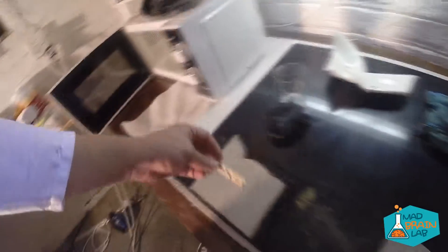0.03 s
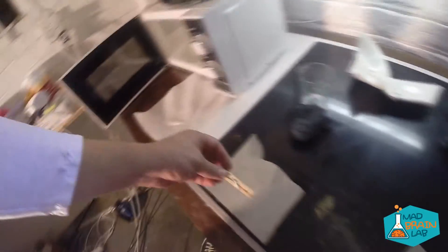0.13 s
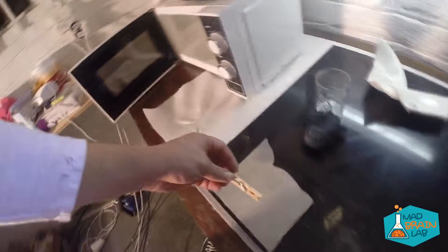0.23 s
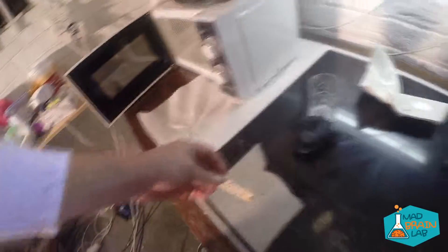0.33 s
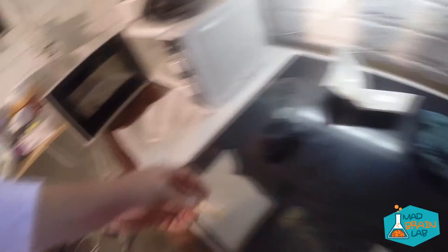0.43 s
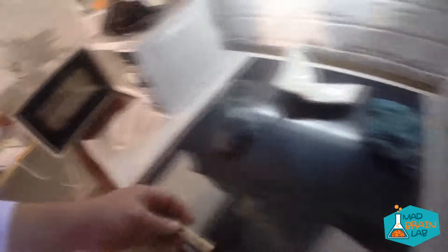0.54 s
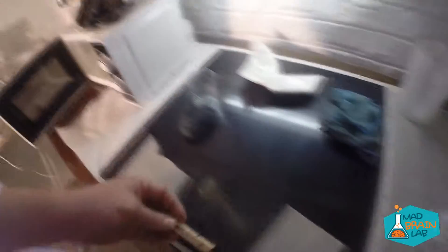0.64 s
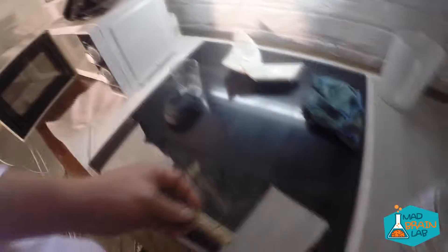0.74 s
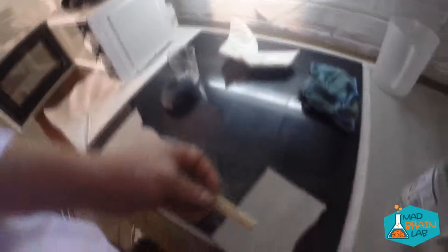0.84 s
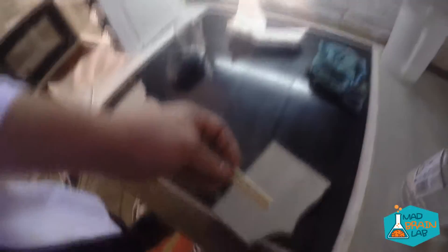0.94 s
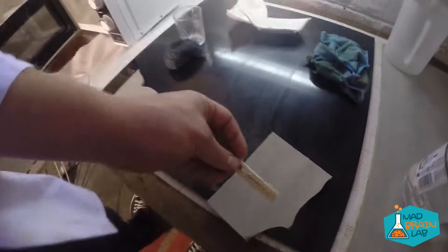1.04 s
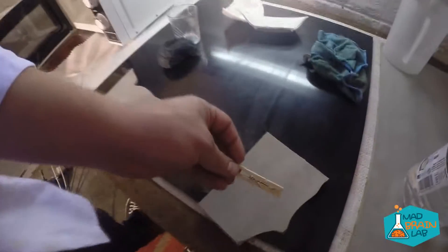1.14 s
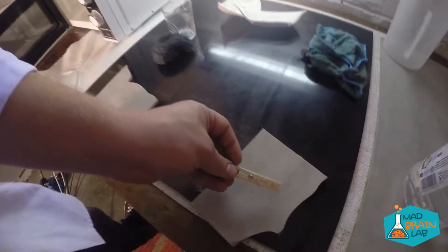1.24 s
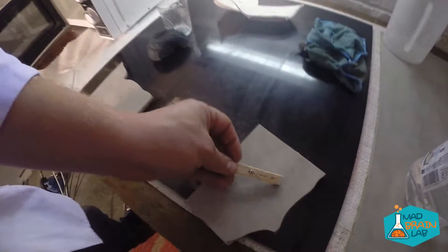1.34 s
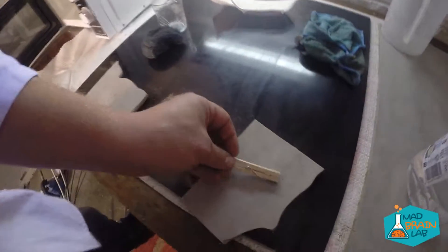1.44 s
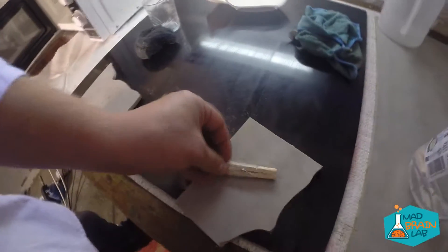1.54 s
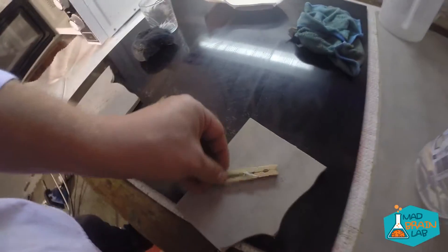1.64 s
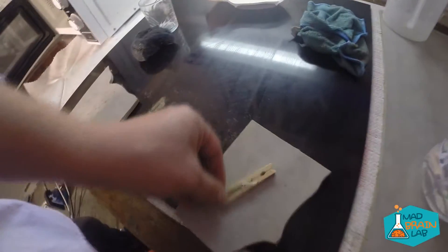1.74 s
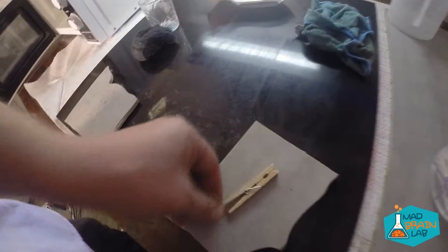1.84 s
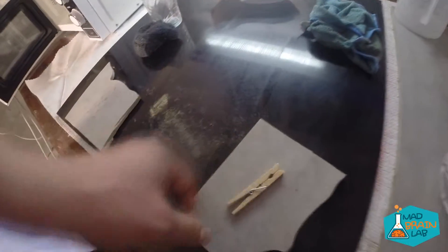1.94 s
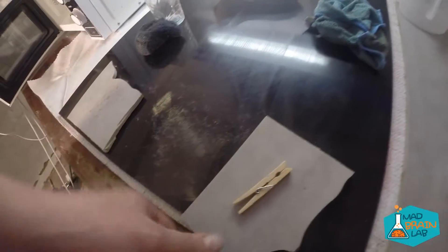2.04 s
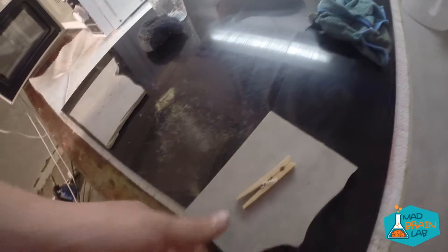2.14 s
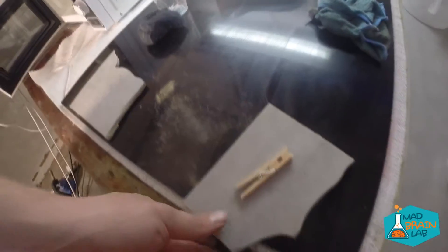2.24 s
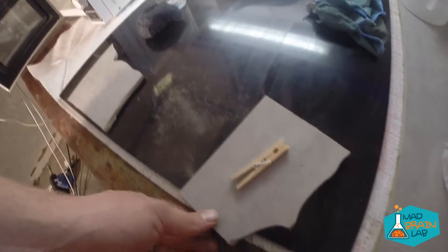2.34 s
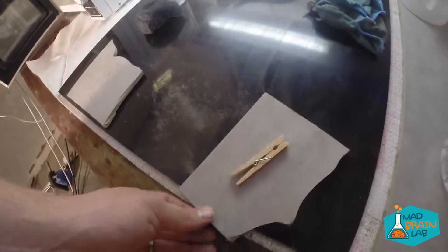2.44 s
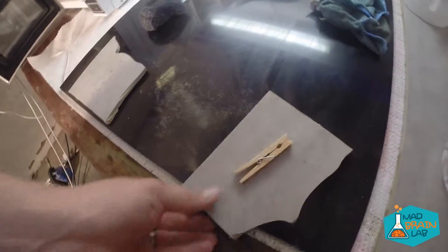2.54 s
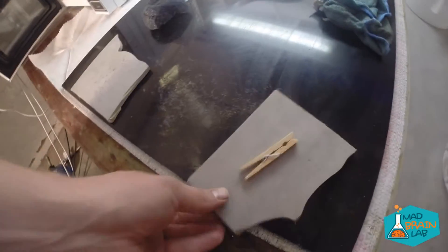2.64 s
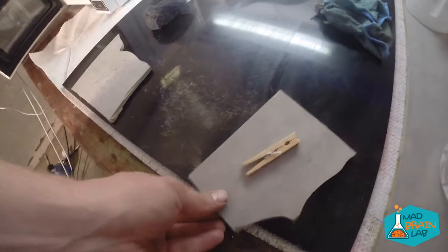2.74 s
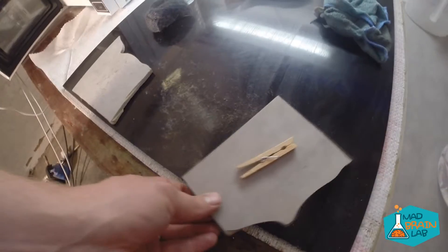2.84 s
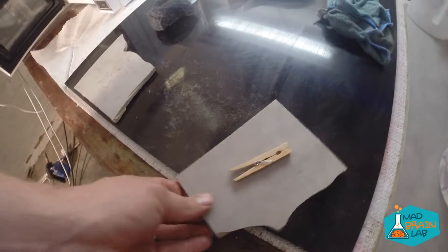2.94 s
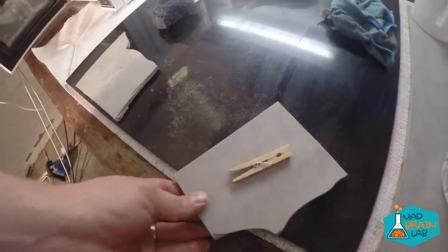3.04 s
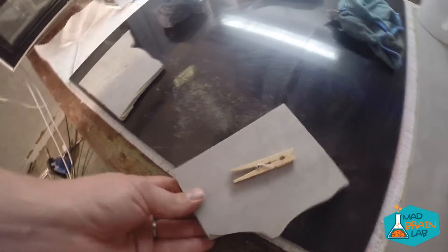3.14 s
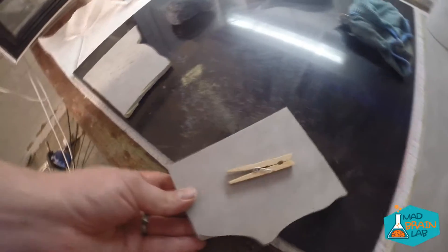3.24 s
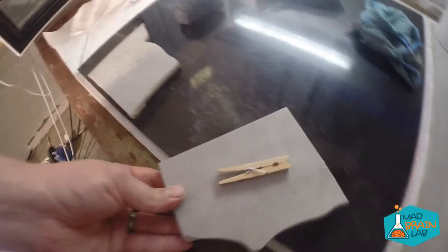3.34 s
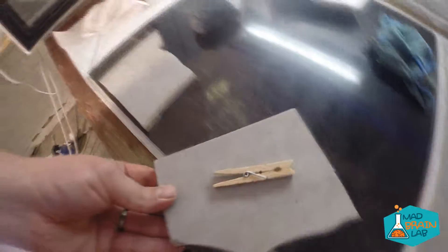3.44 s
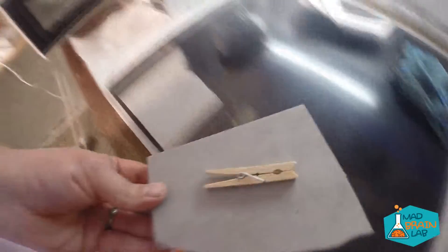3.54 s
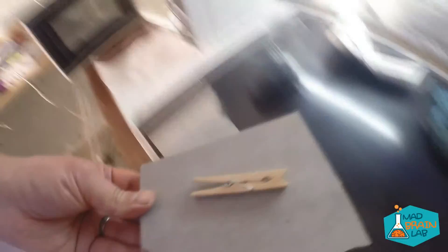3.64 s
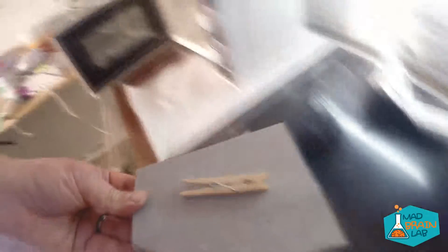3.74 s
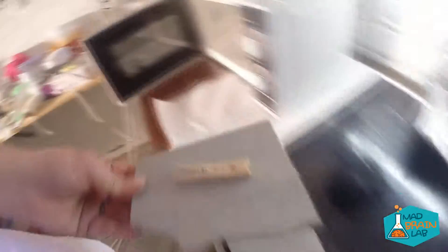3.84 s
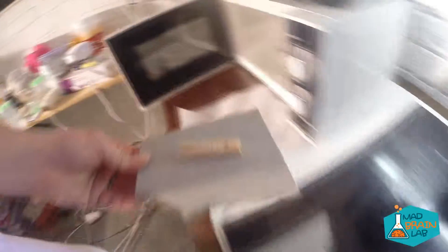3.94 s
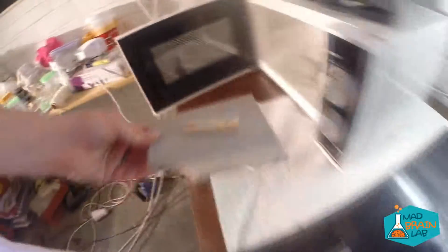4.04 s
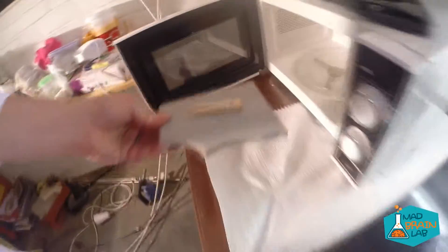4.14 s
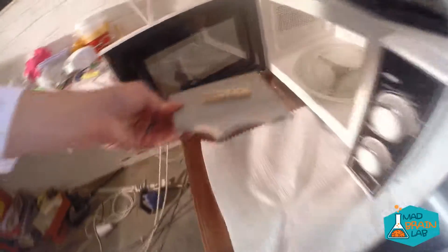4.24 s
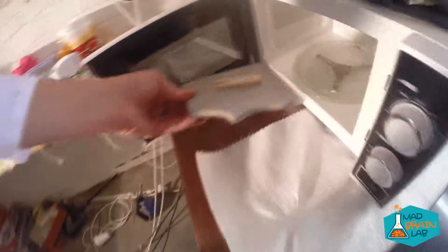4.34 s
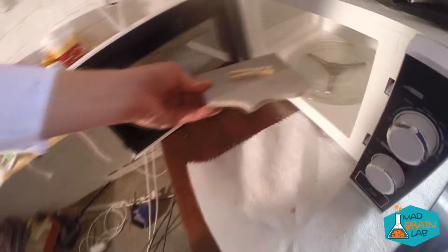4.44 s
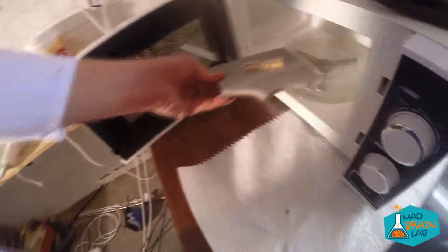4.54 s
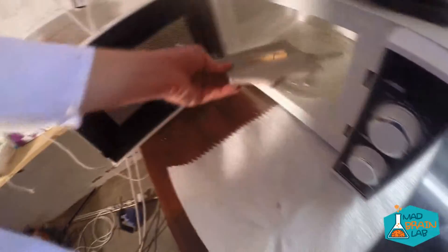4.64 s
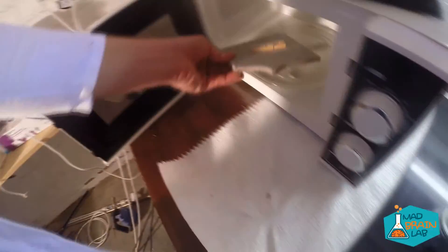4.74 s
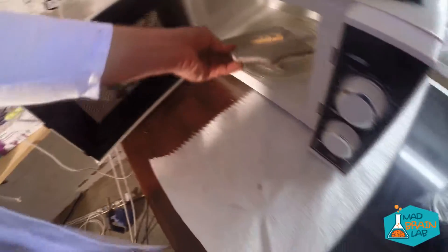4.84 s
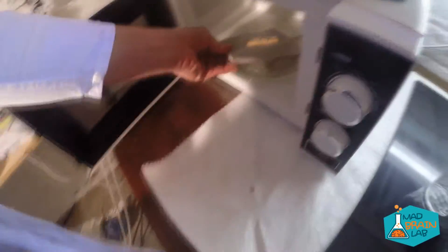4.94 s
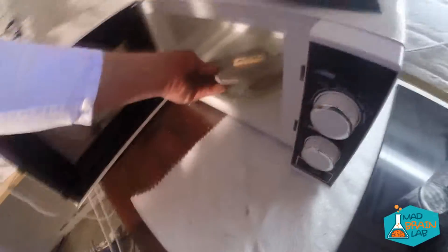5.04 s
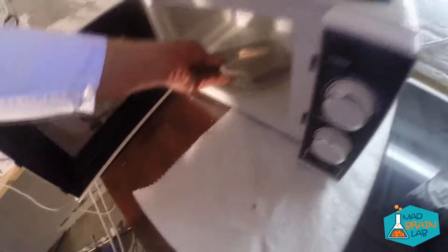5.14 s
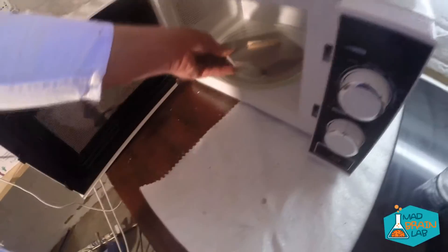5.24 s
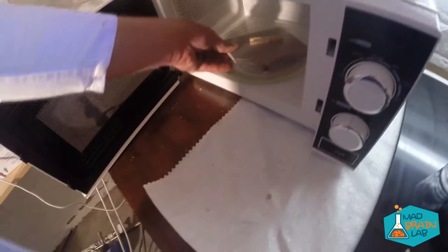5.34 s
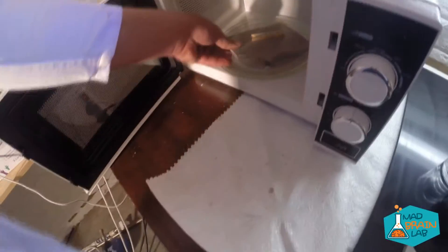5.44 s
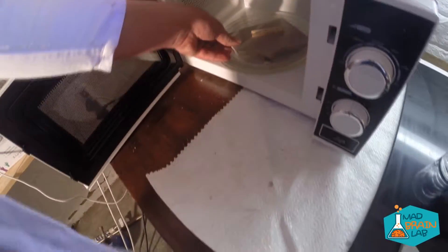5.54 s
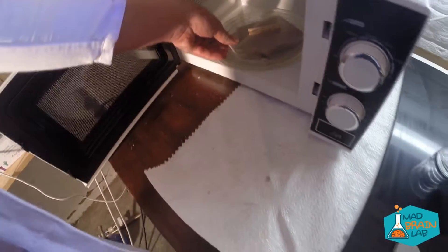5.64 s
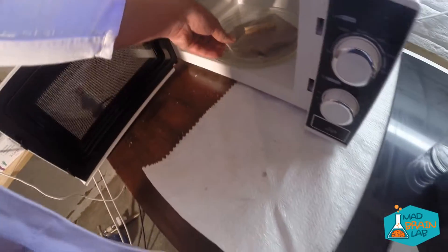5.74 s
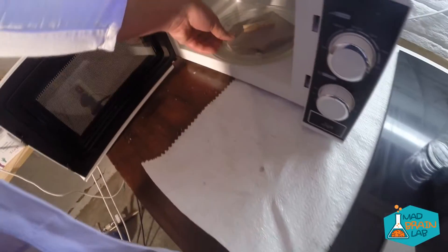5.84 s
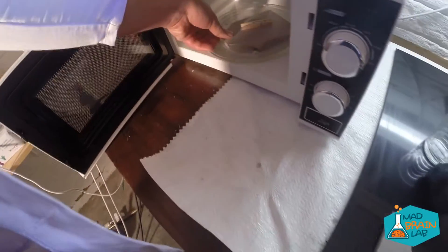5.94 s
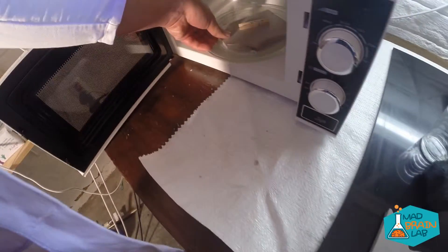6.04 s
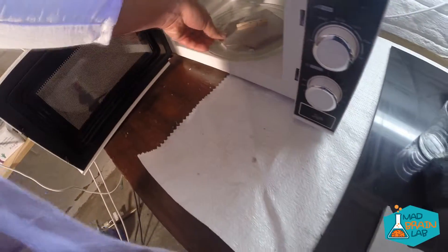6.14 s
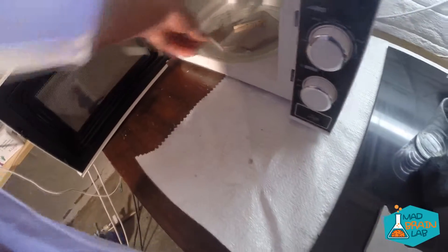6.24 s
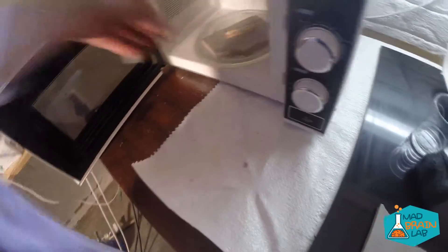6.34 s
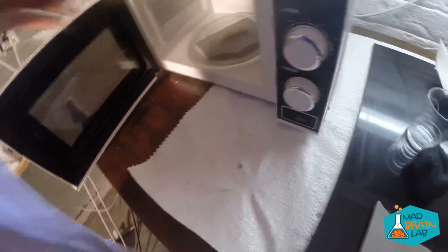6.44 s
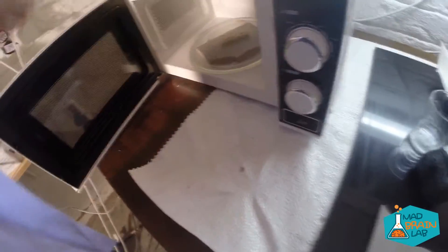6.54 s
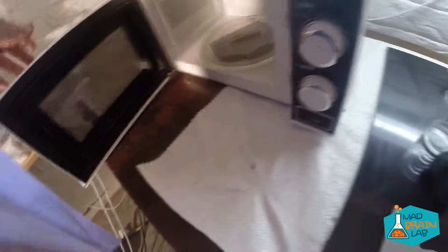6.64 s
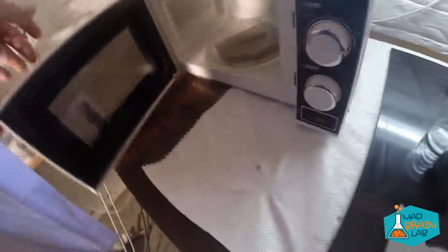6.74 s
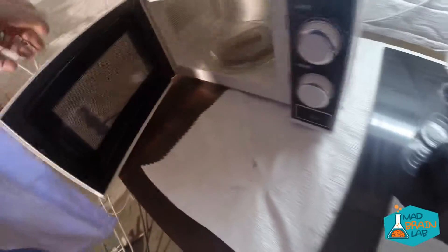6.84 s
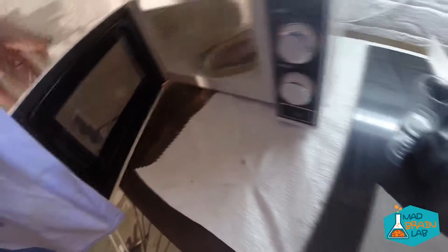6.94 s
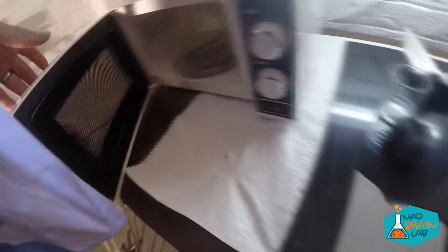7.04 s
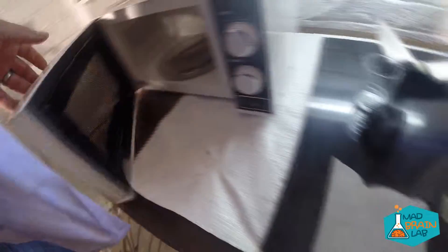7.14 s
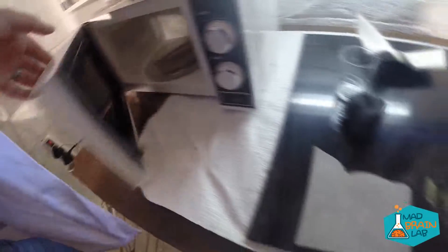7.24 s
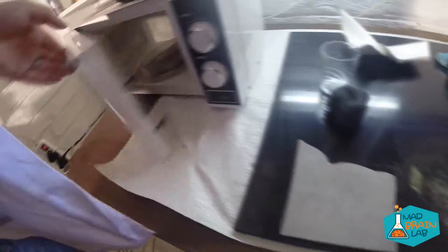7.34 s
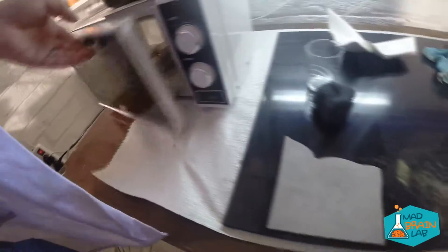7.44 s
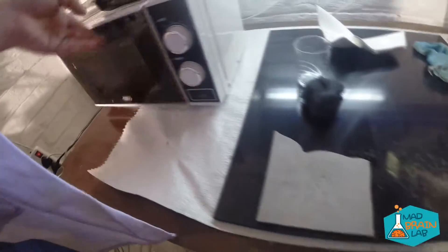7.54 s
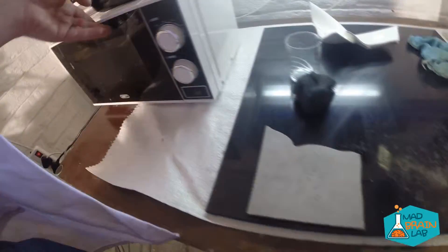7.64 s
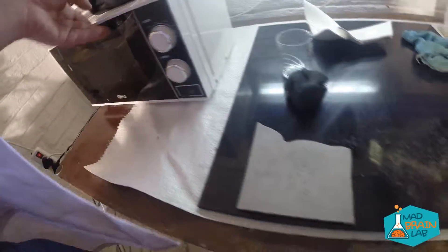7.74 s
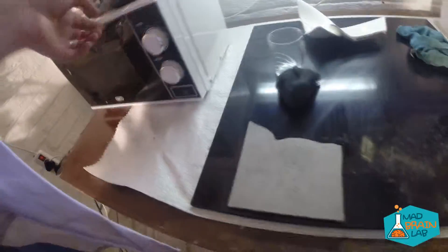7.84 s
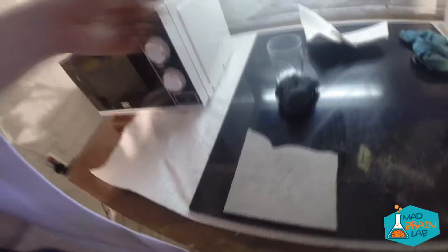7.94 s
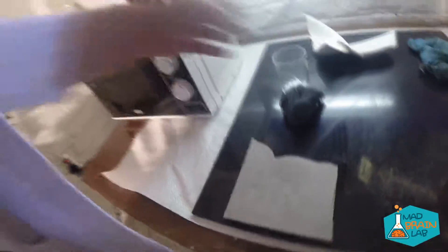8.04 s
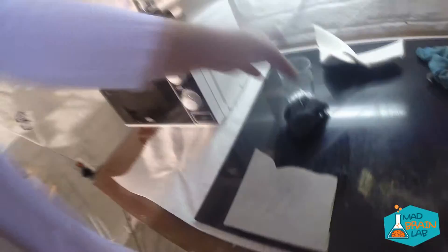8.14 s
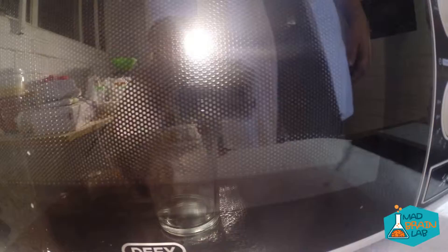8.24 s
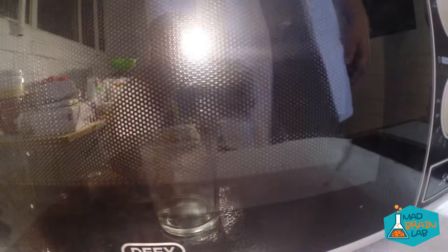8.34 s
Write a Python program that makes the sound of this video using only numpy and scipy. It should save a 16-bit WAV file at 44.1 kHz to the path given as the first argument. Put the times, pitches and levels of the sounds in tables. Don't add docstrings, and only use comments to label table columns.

```python
import sys
import numpy as np
from scipy import signal
from scipy.fft import rfft, irfft, next_fast_len
from scipy.io import wavfile
from scipy.ndimage import map_coordinates

SR = 44100
rng = np.random.default_rng(int(sys.argv[2]) if len(sys.argv) > 2 else 0)


def unload_audio(sound):
    columns = np.transpose(np.atleast_2d(sound))
    steps = np.round(np.clip(columns, -1, 1) * 32767)
    wavfile.write(sys.argv[1], SR, steps.astype(np.int16))


def volts_from_decibels(level):
    exponent = np.asarray(level, float) / 20
    return 10 ** exponent


N = 369558
T = np.arange(N) / SR

# (frequency [Hz], level [dB per Hz])
HISS = [(20, -12), (44, -7), (241, -3), (380, -0.5), (873, 0), (1440, -4), (2100, -6), (3200, -13),
        (5000, -17.5), (6500, -23), (8500, -28), (12500, -30.5), (15000, -41.5), (16000, -57)]
# (time [s], level [dB], rise [s], fall [s])
STIR = (8.5, -46, 2, 0.4)
# (frequency [Hz], level [dB])
WHISTLE = (11000, -64.5)
# (frequency [Hz], level [dB], length [s])
BLIP = (11267, -60.5, .024)
BLIP_TIMES = [1.992, 2.06, 2.207, 2.306, 2.482, 2.62, 2.744, 2.894, 3.041, 3.943, 4.063, 4.174, 4.278,
              4.397, 4.523, 4.704, 4.827, 4.996, 5.151, 6.025, 6.16, 6.21, 6.366, 6.504, 6.622, 6.781,
              6.904, 7.228, 7.38, 7.49]
# (frequency [Hz], time to fall 60 dB [s])
ROOM = [(150, 0.31), (1000, 0.44), (3000, 0.28), (8000, 0.057), (15000, 0.18)]
# (time [s], level [dB])
THUDS = [(0.931, -33), (1.0, -42), (5.087, -37), (6.179, -42), (6.223, -40), (6.385, -33), (7.918, -31),
         (7.969, -28), (8.06, -28), (8.186, -31), (8.34, -22)]
# (time [s], level [dB])
BRIEF_DIP = [
    (8.326, 0),
    (8.333, -16),
    (8.336, 0),
]

# (time [s], level [dB], held [s], swell [dB])
DRAG = [
    (8.06, -29.5, 0.19, 4.5),
    (8.29, -39, 0.041, 4),
]
# (frequency [Hz], width [Hz], level [dB])
DRAG_BODY = [(760, 360, -14.5), (1686, 220, 4), (2390, 334, 0.5), (3940, 150, -4), (5000, 740, -18),
             (6060, 500, -19), (8000, 1200, -31), (9500, 900, -33)]
# (time [s], level [dB], held [s], swell [dB])
HINGE = [
    (7.262, -48, 0.099, 6.5),
    (7.39, -50.5, .19, -0.5),
]
# (time [s], level [dB], centre [Hz])
CREAKS = [(7.224, -29.5, 5000), (7.229, -27, 1600), (7.2435, -28, 3300), (7.262, -36, 6200),
          (7.2745, -39, 8000), (7.286, -34, 6000), (7.304, -33, 6300), (7.317, -34, 3300),
          (7.337, -31, 5500), (7.344, -31, 5600), (7.3717, -27.5, 2500), (7.372, -37, 5000),
          (7.43, -36, 4500), (7.442, -32, 3300), (7.5085, -36, 6050)]
# (frequency [Hz], level [dB per Hz])
HINGE_AIR = [(300, -17), (1500, 5.5), (3300, -1), (6000, -7.5), (9500, -16), (13000, -39)]

# (time [s], ring [dB], clatter [dB], clatter held [s], clatter time to fall 60 dB [s])
CATCH_HITS = [
    (8.058, -18.5, -26.5, 0.0037, .02),
]
DISH_HITS = [
    (8.336, -17, -14.5, 0.0064, 0.031),
    (8.342, -10, -14.5, 0.0068, 0.023),
    (8.357, -22, -15, 0.0039, 0.017),
    (8.366, -31, -29, 0.01, .05),
    (8.376, -24, -30, .003, .05),
]
DOOR_HITS = [
    (7.654, -28, -24.5, .005, 0.062),
    (7.675, -39, -26, 0.0084, 0.068),
    (7.6945, -21, -15, 0.0033, .02),
    (7.698, -12.5, -9, 0.0063, 0.027),
    (7.7065, -17.5, -13.5, .005, 0.025),
]
RATTLE_HITS = [
    (7.710, -16, -14.5, 0.0054, 0.056),
    (7.727, -22, -16.5, .006, 0.055),
    (7.742, -33, -21.5, .006, 0.073),
    (7.762, -33, -26.5, 0.0093, 0.067),
    (7.792, -31, -35, 0.0084, .15),
    (7.82, -37, -37, 0.0084, 0.13),
]
PEG_HITS = [
    (0.968, -33, -37, 0.004, .012),
    (0.999, 1, -17.5, 0.0016, 0.018),
    (1.003, -37, -21.5, 0.028, 0.0087),
    (1.024, -27, -22.5, 0.0019, .008),
    (1.032, -40, -28, 0.013, .05),
    (1.05, -40, -29.5, 0.015, .05),
    (1.088, -30, -40.5, .025, .05),
]
SET_HITS = [
    (5.058, -2.5, -15.5, 0.0076, 0.17),
    (5.096, -31, -23, 0.0091, 0.22),
    (5.125, -45, -33, 0.056, .03),
]
DROP_HITS = [
    (6.2165, -16.5, -17, 0.0055, 0.028),
    (6.222, -3, -16, 0.03, .03),
]
ROCK_HITS = [
    (6.236, -8, -30, .003, .02),
    (6.2715, -13.5, -30, .003, 0.027),
]
SETTLE_HITS = [
    (6.258, -15, -19.5, 0.0061, 0.11),
    (6.272, -20, -21, .004, 0.044),
    (6.287, -18, -23, 0.0056, 0.078),
]

# (frequency [Hz], level [dB], time to fall
# 60 dB [s])
CATCH = [(120, -7, 0.046), (348, -21, .04), (692, 9, 0.029), (7800, -16, 0.033)]
DISH = [(98, -30, 0.053), (785, -29, 0.083), (1460, 2.5, 0.072), (1940, 6, 0.06), (2250, -3, 0.081),
        (2455, -0.5, 0.45), (2570, -18, .1), (5510, -7, 0.057), (5860, -16, .05), (9570, -29, 0.33)]
DOOR = [(179, -6, 0.21), (243.4, -17, 0.71), (370.3, -4.5, 0.2), (423, -4.5, 0.22), (646, -8.5, 0.39),
        (844, -0.5, 0.13), (1220, -2, 0.08), (1446, 4, 0.13), (1887, 3.5, 0.1), (2260, -5, .08),
        (2564, 5, 0.1), (3310, 2, 0.12), (3880, -7, 0.1), (4830, -10, .08), (5750, -15, 0.08)]
PEG = [(197, -29, 0.0225), (680, 6.5, 0.017), (1400, 8, 0.0095), (1836, 8, 0.02), (2090, 10.5, 0.014),
       (2860, -10, .012)]
PLATE = [(276, -27.5, 0.27), (700, -25, 0.49), (1066, 0.5, 0.49), (1000, -20, .2), (1112, -12, 0.26),
         (1150, -21, .2), (1227, -12, 0.2), (1231, -10.5, 0.46), (1563, -7.5, 0.068), (2404, -19.5, 1),
         (2517, -21, .25), (3050, -14, 0.084), (3310, -14, 0.06), (3700, -11, 0.047), (4640, -23.5, 0.16),
         (5560, -27, 0.19), (6800, -33.5, .2)]
CLINK = [(312.3, -12.5, 0.33), (687.6, -14, 0.25), (827, -11, 0.26), (1072, 3.5, 0.17), (1106, -1.5, 0.24),
         (1227, -6, 0.28), (1650, -11, 0.1), (1990, -15, 0.17), (2384, -2, 0.18), (2796, -11.5, 0.3),
         (3774, -12, 0.48), (4450, 4.5, 0.05),
         (3370, 3, .19), (4237, -9, .16), (5593, -4, .2), (5782, -5, .22), (6132, -3, .12), (6804, -8, .26),
         (7494, -16, .15), (8060, -14, .24), (8333, -6, .14), (8535, -17, .2), (9351, -16, .24)]
ROCK = [(1099, -1, 0.13), (2390, -8, .08), (2800, -9, .15), (4240, 1.5, 0.29)]
SETTLE = [(240, -13.5, 0.3), (309, -10, 0.22), (690.5, -4, 0.12), (1070, -8, 0.078), (1618, -3, 0.2),
          (2400, -11, 0.15), (5690, -1, 0.06), (3370, -12, .12)]

# (frequency [Hz], level [dB per Hz])
CATCH_AIR = [(35, -38), (60, 1), (682, -5), (1470, -16), (2250, 0), (3420, -15), (7750, -21), (14900, -55),
             (16000, -74)]
DISH_AIR = [(35, -35), (60, -6.5), (540, -28.5), (785, -11.5), (1250, -18), (1470, -15), (1620, -16),
            (2250, -0.5), (3340, -32), (4750, -48), (5720, -13.5), (6900, -45), (9790, -43), (16000, -60)]
DOOR_AIR = [(60, -48), (500, -13), (850, 2), (1450, -2.5), (2580, -1), (3600, -10.5), (5900, -11.5),
            (8000, -27.5), (10000, -27), (13000, -43), (16000, -52)]
RATTLE_AIR = [(60, -42), (500, -10), (850, -2.5), (1450, 2.5), (2500, -1.5), (3600, -14), (6000, -20.5),
              (16000, -62)]
PEG_AIR = [(60, -40), (350, -34), (700, -19), (1400, -9), (2050, 3), (2500, -5.5), (3300, -10.5),
           (4200, -21), (5000, -12), (6500, -21), (7700, -15), (9000, -37), (12000, -35), (16000, -60)]
SET_AIR = [(60, -28), (500, -26.5), (1060, -7.5), (1500, -8), (2000, -20), (2500, -11), (3400, -24),
           (4200, -29), (5500, -31.5), (8500, -48), (13000, -51), (16000, -64)]
DROP_AIR = [(60, -32), (900, -9.5), (2000, -5), (4000, -9.5), (6000, -13), (9000, -31), (13000, -28),
            (16000, -39)]
SETTLE_AIR = [(100, -31), (700, -2), (2500, 2), (5000, -14), (9000, -30), (16000, -70)]

# (time [s], change [dB], recovery [s])
GRIP = [
    (5.082, -10, .003),
    (5.091, -7, .003),
    (5.0975, -6, .002),
    (5.123, -8, .003),
    (5.143, -20, 0.0084),
    (5.161, -8, .004),
    (5.203, -8, .005),
]
# (time [s], level [dB])
LANDING = [
    (6.256, 0),
    (6.262, -2),
    (6.267, -5),
    (6.272, -1),
    (6.291, -2),
    (6.31, -6),
    (6.34, -7),
    (6.45, -16),
    (6.7, -30),
]

# (time [s], peak [dB], low part [dB], ring part [dB], favoured pitch [Hz])
COUNTER_TAPS = [(1.1847, -41, 2, -16, 7500), (1.4298, -33, 1, 3.5, 4300), (1.502, -42, 2, -20, 6000),
                (1.6886, -35, 6.5, -6, 1930), (1.69, -40, -20, -20, 7500), (1.712, -42, -5, -10, 7000),
                (1.7205, -42, 8, -15, 1930), (1.737, -44, -15, -20, 7000), (1.8228, -42, -5, -4, 3370),
                (2.5815, -30, 2, -9, 2290), (2.5944, -34, 2, -20, 1930), (2.715, -36.5, 2, -18, 8150),
                (2.7681, -39, 7, -20, 1930), (2.7814, -42.5, 2, 0.5, 3370), (2.8474, -42, -2, -4, 3370),
                (2.874, -34.5, 3, -10, 1600), (2.912, -24.5, 4.5, -6, 1600), (2.913, -32, -18, -20, 4790),
                (2.914, -35, -20, -20, 8650), (2.9693, -32, -31, -25, 5200), (2.9925, -33, -15, -20, 6200),
                (3.0285, -38, -2, -8, 6750), (3.0367, -38, 7, -20, 2400), (3.278, -34, -9, -12, 3880),
                (3.2974, -33.5, 3.5, -6, 1580), (3.299, -43, -20, -18, 8900)]
TURNTABLE_TAPS = [(5.131, -40, -10, -15, 6700), (5.141, -40, -10, -15, 5200), (5.1533, -35, 10, -15, 2400),
                  (5.1727, -40, 7, -11, 5200), (5.2465, -31.5, -6, 2, 5950), (5.463, -38, -5, -17, 4820),
                  (5.5932, -30.5, -4, -3, 3820), (5.595, -37, -20, -20, 6700), (5.645, -41, -5, -20, 3800),
                  (5.829, -39.5, 9, -19, 4820), (6.5201, -39, 5, -20, 9000), (6.6253, -44, 6, -17, 9000)]
# (frequency [Hz], level [dB], time to fall 60 dB [s])
TILE = [(1152, 1, 0.046), (1600, 1.5, 0.041), (1933, 0, 0.064), (2520, 0.5, 0.034), (3370, 1, 0.079),
        (3880, -2.5, 0.077), (4790, 1.5, 0.057), (5640, -9, .07), (5950, -5, 0.06), (6750, -9, 0.06),
        (8150, -2, 0.067), (8650, -4, 0.067), (9350, -6, .06)]
RIM = [(2410, -0.5, 0.092), (3330, -10, 0.12), (3800, -5, 0.12), (4230, -7, 0.13), (4700, -2, .08),
       (5200, -10, .08), (5680, -6, .12), (5880, -7, 0.2), (6200, -9, 0.11), (6700, -2, .12),
       (8340, -6, .1), (8560, -8, .08)]
RUBBED = [(1560, -6, 0.024), (1947, -3.5, 0.046), (2286, -3, 0.047), (2510, -1.5, 0.022),
          (3470, -10, 0.066), (3880, -14, 0.055), (4750, -14, 0.043), (6560, -19, .06)]
# (time [s], level [dB])
JERKS = [
    (1.69, -39),
    (1.824, -43),
    (2.848, -40),
    (2.91, -41),
]
# (time of top speed [s], level [dB])
PUSHES = [
    (2.802, -41),
    (3.11, -36.5),
    (3.306, -40.5),
]
# (time [s], level [dB], frequency [Hz], held [s])
SING = [(1.432, -46, 3372, .015), (1.692, -45, 3372, .015), (1.715, -49, 3372, .035),
        (1.765, -53, 3372, .035), (1.826, -47, 3372, .012), (1.85, -56, 3372, .04), (2.96, -55, 3372, .06),
        (3.15, -56, 3372, .13), (2.755, -54, 1930, .012), (2.769, -46, 1930, .045), (2.835, -52, 1930, .03),
        (2.782, -47, 3372, .05), (2.905, -47, 3372, .04), (2.915, -49, 3880, .05), (3.03, -52, 3372, .01),
        (3.06, -52, 3372, .02), (3.085, -50, 1930, .03), (3.115, -54, 3372, .015), (3.28, -50, 3900, .035),
        (3.29, -54, 5620, .03), (3.297, -48, 3372, .08)]


def unit(x):
    return x / np.sqrt(np.mean(x ** 2) + 1e-20)


def along(points, hz):
    f, v = np.transpose(points)
    return np.interp(np.log(hz + 1), np.log(f + 1), v)


def level(rows, outside):
    s, db = np.transpose(rows)
    return volts_from_decibels(np.interp(T, s, db, left=outside, right=outside))


def wobble(rate):
    knots = rng.standard_normal(int(N * rate / SR) + 4)
    return map_coordinates(knots, [T * rate])


def noise(gain, size=N):
    m = next_fast_len(size + 8192)
    spectrum = rfft(rng.standard_normal(m)) * gain(np.fft.rfftfreq(m, 1 / SR))
    return unit(irfft(spectrum, m)[:size])


def coloured(points, size=N):
    return noise(lambda hz: volts_from_decibels(along(points, hz)), size)


def add(track, s, piece):
    seat = track[round(s * SR):][:len(piece)]
    seat += piece[:len(seat)]


def onset(t, rise):
    return 1 - np.exp(-t / rise)


def stroke(s, db, rise, fall, held=0, swell_db=0):
    during = np.clip((T - s) / (held + 1 / SR), 0, 1)
    before = 20 * np.maximum(s - T, 0) / rise
    after = 20 * np.maximum(T - s - held, 0) / fall
    return volts_from_decibels(db + swell_db * during - before - after)


def ring(modes, spread_db, rise, rough=0.0, size=SR // 3):
    hz, db, t60 = np.transpose(modes)[:, :, None]
    t = T[:size]
    chance = rng.standard_normal((len(modes), 1))
    sides = np.pi * np.arange(len(modes))[:, None]
    knots = np.cumsum(rng.standard_normal((len(modes), 70)), axis=1)
    wander = rough * np.array([np.interp(t * 200, np.arange(70), row) for row in knots])
    strength = volts_from_decibels(db + spread_db * chance - 60 * t / t60)
    waves = strength * np.sin(2 * np.pi * hz * t + sides + wander)
    return waves.sum(axis=0) / np.linalg.norm(volts_from_decibels(db)) * onset(t, rise)


def room(x):
    hz, t, z = signal.stft(rng.standard_normal(SR // 2), SR, nperseg=256)
    fading = z * volts_from_decibels(-60 * t / along(ROOM, hz)[:, None])
    tail = signal.istft(fading, SR, nperseg=256)[1]
    delayed = np.pad(x, (200, 0))
    return signal.fftconvolve(delayed, tail / np.linalg.norm(tail))[:N]


def blow(hits, modes, air, wet_db, rise=0.00098, rough=0.26, damping=1):
    tones, scuffs, t = np.zeros(N), np.zeros(N), T[:SR // 5]
    for s, ring_db, clatter_db, held, t60 in hits:
        clatter = coloured(air, len(t))
        add(tones, s, volts_from_decibels(ring_db) * ring(modes, 0.83, rise, rough))
        fade = volts_from_decibels(clatter_db - 60 * np.maximum(t - held, 0) / t60)
        add(scuffs, s, fade * onset(t, rise) * clatter)
    out = damping * tones + scuffs
    return out + volts_from_decibels(wet_db) * room(out)


def taps(rows, modes, crack_db, high_db, lasts):
    out, t = np.zeros(N), T[:SR // 20]
    for s, db, low_db, ring_db, spot_hz in rows:
        life = lasts * volts_from_decibels(-.2 * (db + 31.5))
        low = [(500, low_db - 3.5), (1600, low_db), (2100, low_db), (2900, 3)]
        high = [(3800, -3.5), (5800, -6.5), (7500, high_db), (9400, high_db), (12500, high_db - 28)]
        colour = low + [(3370, ring_db + 6.5)] + high
        shaped = []
        for hz, g, t60 in modes:
            octaves = np.log2(hz / spot_hz)
            favour = 9.5 * np.exp(-(octaves / 0.22) ** 2)
            shaped.append((hz, g + along(colour, hz) + favour, t60 * life))
        size = np.linalg.norm(volts_from_decibels(np.transpose(shaped)[1]))
        add(out, s, volts_from_decibels(db - 7) * size * ring(shaped, 2.5, .0012, .12, size=SR // 8))
        fade = volts_from_decibels(db + max(low_db, high_db, 0) + crack_db - 60 * t / 0.069)
        add(out, s, fade * onset(t, 0.00049) * coloured(low + high, len(t)))
    return out


def camera():
    hiss_level = (volts_from_decibels(-43) + stroke(*STIR)) * volts_from_decibels(1.22 * wobble(5.38))
    out = hiss_level * coloured(HISS)
    whistle_hz, whistle_db = WHISTLE
    out += volts_from_decibels(whistle_db) * np.sqrt(2) * np.sin(2 * np.pi * whistle_hz * T)
    hz, db, length = BLIP
    t = T[:round(length * SR)]
    for s in BLIP_TIMES:
        loudness = volts_from_decibels(db + rng.standard_normal())
        add(out, s - length / 2, loudness * signal.windows.tukey(len(t), .3) * np.sin(2 * np.pi * hz * t))
    return out


def thuds():
    out, t = np.zeros(N), T[:SR // 8]
    mount_hz = 86
    for s, db in THUDS:
        add(out, s, volts_from_decibels(db + 3.0 - 60 * t / 0.026) * np.sin(2 * np.pi * mount_hz * t))
    return out


def drag():
    def body(f):
        total = 0
        for k, (centre, width, db) in enumerate(DRAG_BODY):
            pull = 1j * f * width
            total = total + (-1) ** k * volts_from_decibels(db) * pull / (centre * centre - f * f + pull)
        return total

    motion = sum(stroke(s, db, 0.0099, 0.053, held, swell_db) for s, db, held, swell_db in DRAG)
    return motion * unit(volts_from_decibels(1.5 * wobble(160)) * noise(body))


def dish():
    knock = blow(DISH_HITS, DISH, DISH_AIR, wet_db=-5.0, rise=0.0029)
    return knock + blow(CATCH_HITS, CATCH, CATCH_AIR, wet_db=-22)


def hinge():
    motion = sum(stroke(s, db, .06, .025, held, swell_db) for s, db, held, swell_db in HINGE)
    out = motion * unit(volts_from_decibels(3.8 * wobble(90)) * coloured(HINGE_AIR))
    t = T[:SR // 20]
    for s, db, centre_hz in CREAKS:
        def creak_colour(hz):
            peak = centre_hz / 2500 / (1 + ((hz / centre_hz - 1) / 0.14) ** 2)
            return volts_from_decibels(along(HINGE_AIR, hz)) * (0.44 + peak)

        fade = volts_from_decibels(db - 8.5 - 60 * np.maximum(t - .004, 0) / 0.03)
        add(out, s, fade * onset(t, 0.001) * noise(creak_colour, size=len(t)))
    return out + volts_from_decibels(-12.0) * room(out)


def door():
    slam = blow(DOOR_HITS, DOOR, DOOR_AIR, wet_db=-10.0, rise=0.0011, rough=0.75)
    return slam + blow(RATTLE_HITS, DOOR, RATTLE_AIR, wet_db=-10, rise=0.0024, rough=1.25)


def peg():
    return blow(PEG_HITS, PEG, PEG_AIR, wet_db=-17.0, rise=0.00015)


def rocking():
    chokes = 0
    for s, db, back in GRIP:
        closeness = np.minimum(1 + (T - s) / 0.0065, 1 - (T - s) / back)
        chokes = chokes + db * np.clip(closeness, 0, 1)
    start, rest, flat = GRIP[0][0], 5.112, 5.195
    fed = 4 * np.clip((T - start) / (rest - start), 0, 1)
    fed = fed - 11 * np.clip((T - rest) / .005, 0, 1)
    return volts_from_decibels(fed + chokes - 20 * np.maximum(T - flat, 0) / .16)


def plate():
    return blow(SET_HITS, PLATE, SET_AIR, wet_db=-21, rise=.0025, rough=.1, damping=rocking())


def clink():
    choke = level(LANDING, outside=0)
    out = blow(DROP_HITS, CLINK, DROP_AIR, wet_db=-15, rise=.002, rough=.09, damping=choke)
    out += blow(ROCK_HITS, ROCK, SETTLE_AIR, wet_db=-17, rise=.004, rough=0.12, damping=choke ** 2)
    return out + blow(SETTLE_HITS, SETTLE, SETTLE_AIR, wet_db=-7.0, rise=0.0019, rough=0.19)


def tile():
    grit = rng.standard_normal(N) * volts_from_decibels(3 * wobble(70))
    rub = unit(signal.fftconvolve(grit, ring(RUBBED, 0, 0.00028))[:N])
    out = taps(COUNTER_TAPS, TILE, crack_db=-8.0, high_db=-15.5, lasts=0.67)
    out += taps(TURNTABLE_TAPS, RIM, crack_db=-9.5, high_db=-16, lasts=0.54)
    speed = sum(stroke(s, db, 0.0071, 0.064) for s, db in JERKS)
    speed += sum(stroke(s, db, 0.2, 0.05) for s, db in PUSHES)
    out += speed * volts_from_decibels(-5) * rub
    drift = 1.3 * wobble(40)
    song = np.zeros(N)
    for s, db, hz, held in SING:
        song += stroke(s, db, .006, .04, held, -6) * np.sin(2 * np.pi * hz * T + drift)
    out += song * volts_from_decibels(3 + 2.2 * wobble(70))
    return out + volts_from_decibels(-10.5) * room(out)


def scene():
    blows = peg() + plate() + clink() + door() + dish()
    rubbing = tile() + hinge() + drag()
    return (blows + rubbing + thuds() + camera())[None]


def low_pass(x):
    return signal.sosfilt(signal.butter(12, 15800, fs=SR, output="sos"), x)


def record(dry):
    x = dry * level(BRIEF_DIP, outside=0)
    x = x / (1 + np.abs(x / .66) ** 6) ** (1 / 6)
    m = next_fast_len(N)
    passed = np.fft.rfftfreq(m, 1 / SR) < 15750
    x = irfft(rfft(x, m) * passed, m)[:, :N]
    return low_pass(x)


dry = scene()
out = record(dry)
unload_audio(out)
```